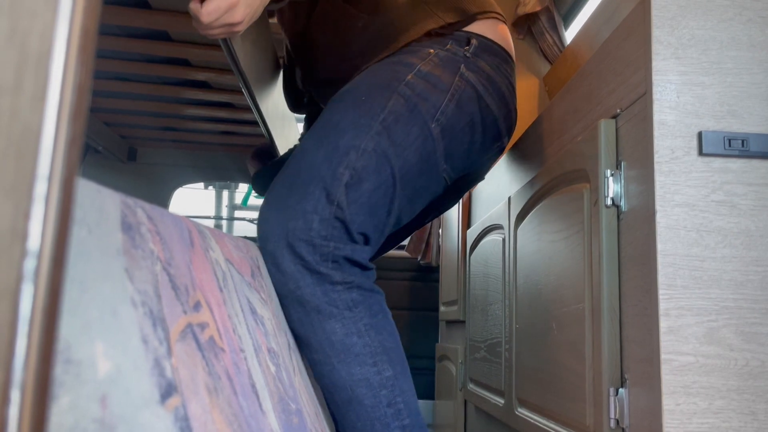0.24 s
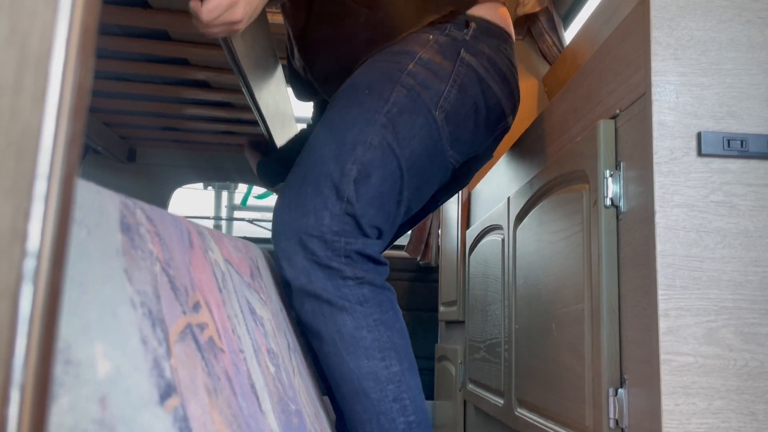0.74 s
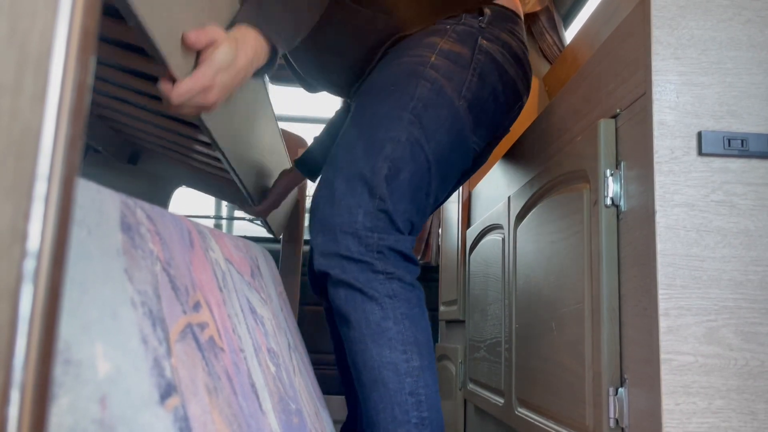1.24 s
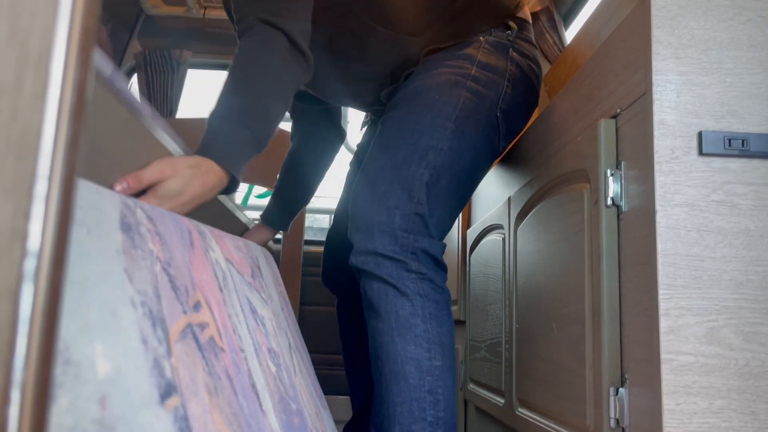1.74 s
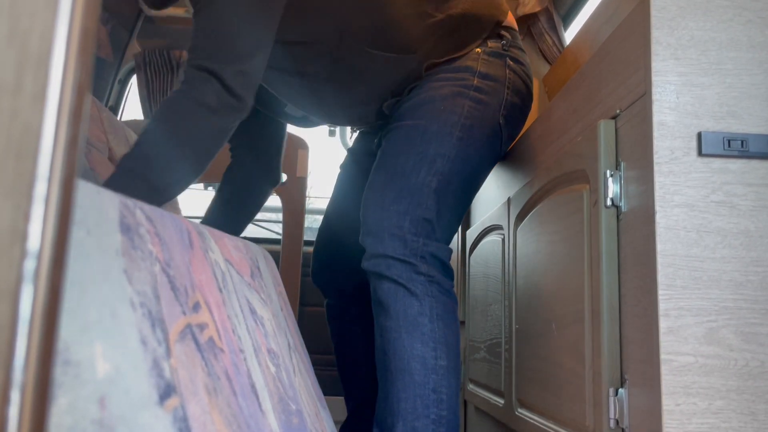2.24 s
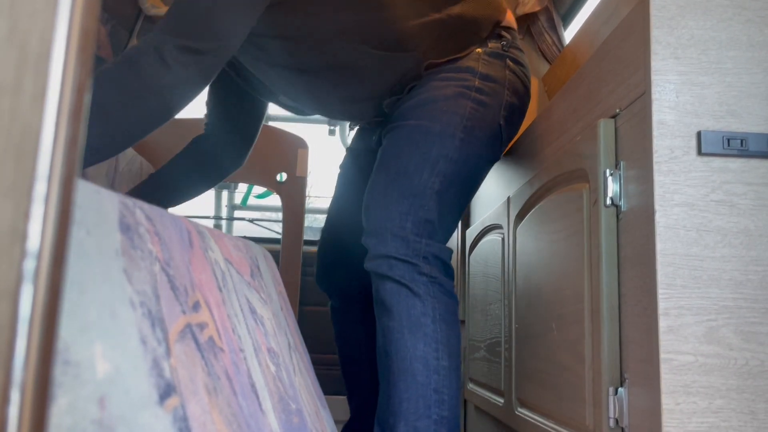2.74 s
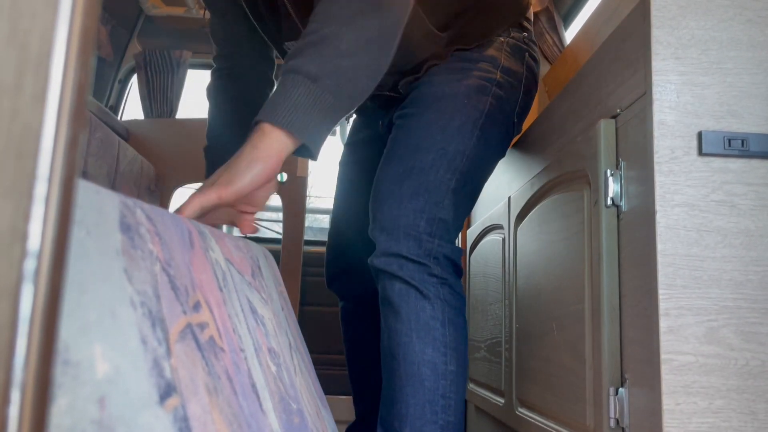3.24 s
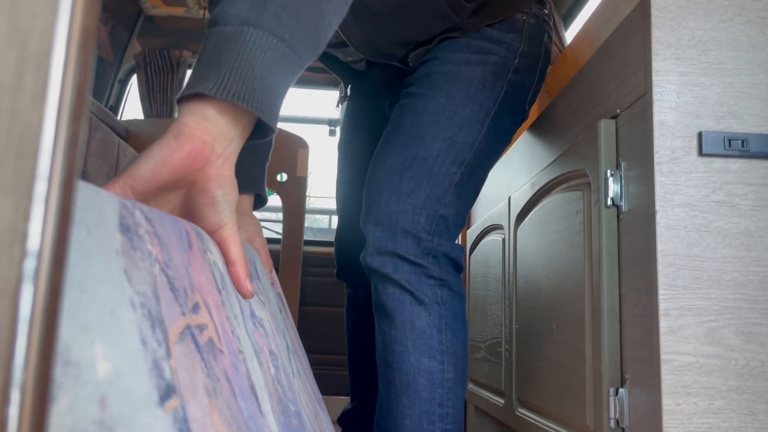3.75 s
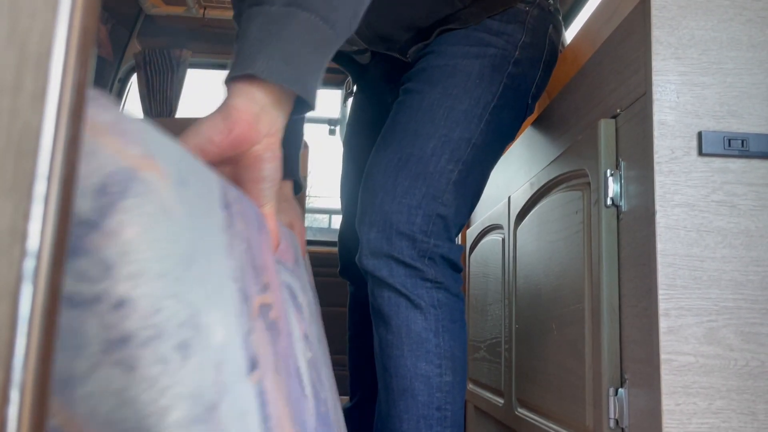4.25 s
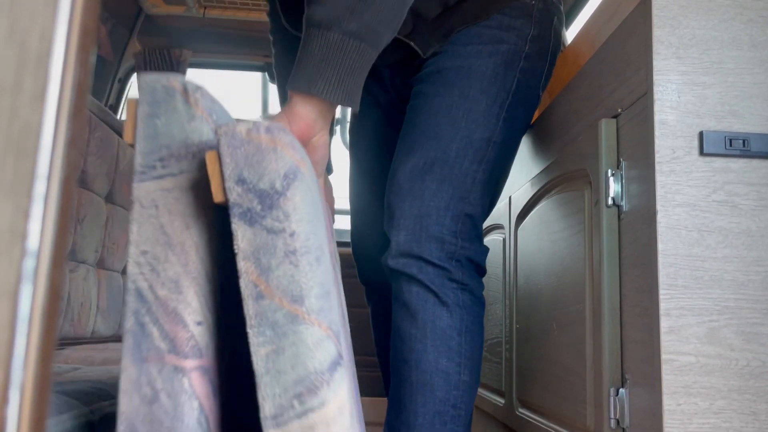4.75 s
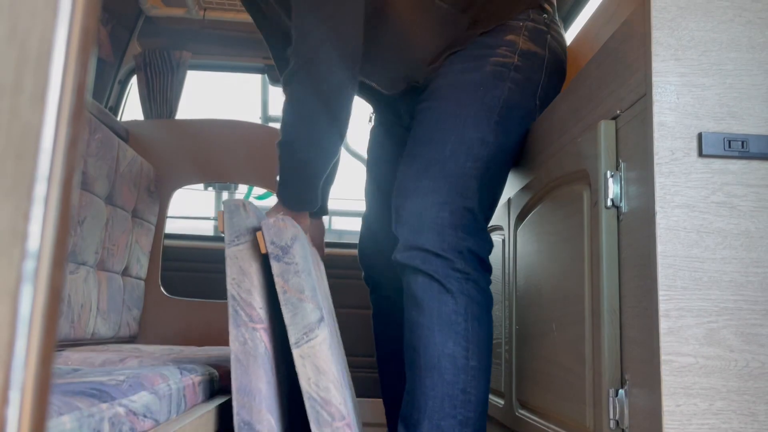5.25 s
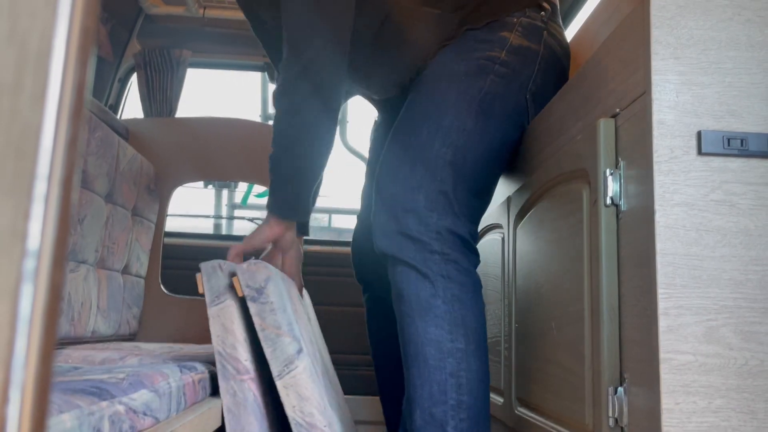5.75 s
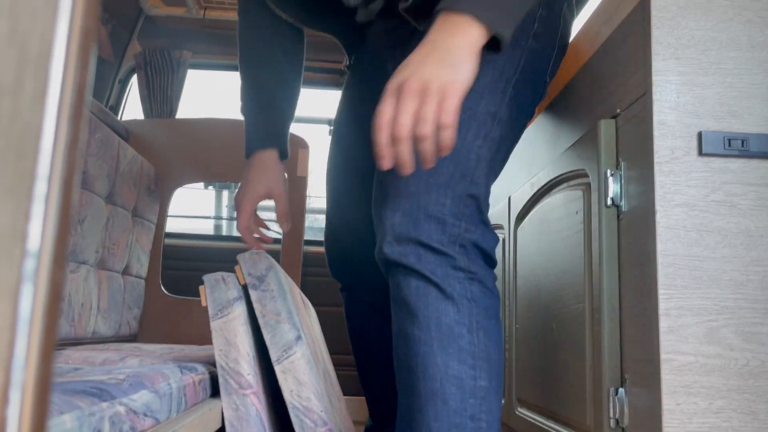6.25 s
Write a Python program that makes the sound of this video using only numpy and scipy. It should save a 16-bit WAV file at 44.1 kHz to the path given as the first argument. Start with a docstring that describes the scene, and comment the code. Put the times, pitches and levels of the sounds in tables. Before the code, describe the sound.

A low engine idle hums throughout, a deep droning boom with a slight throb that swells gently around 2.5 to 4 seconds. Close by, in a dry padded cabin, light wooden ticks and fabric scuffs at 0.3 to 0.7 s lead to a sharp, loud, rattling clack at 0.8 s. A small click follows at 1.25 s, with faint sleeve brushing. Around 2.4 to 2.6 s wood groans briefly and a soft thump lands. Clothing rustles lightly from 3.2 to 3.8 s. At 4.1 s a double dull knock starts the heavier part: a firm wooden thud at 4.8 s with a cloth snag at 4.9, sliding upholstery and a faint groan near 5.2, a deep thump at 5.4, two knocks at 5.75 and 5.87, a bassy thud at 6.0, and a final loud wooden slam at 6.45 s. Every impact dies quickly, leaving the hum.

```python
"""In a camper van with its engine idling, a bench seat is folded by hand.
The engine is a stack of hums over throbbing noise; clothes and upholstery are shaped hiss.
Dragged wood groans as noise around one pitch, and cushions land as short, low floor swings.
The slatted wooden frame clacks: each blow is a sum of short rings plus a rattling noise burst.
The small padded cabin swallows every ring quickly."""
import sys
import numpy as np
from scipy import signal
from scipy.fft import rfft, irfft
from scipy.io import wavfile

SR = 44100
rng = np.random.default_rng(int(sys.argv[2]) if len(sys.argv) > 2 else 0)


def unload_wav(signal):
    """Save mono or channel-first audio to the path in sys.argv[1] as 16-bit WAV at rate SR, clipped to [-1, 1]."""
    wavfile.write(
        sys.argv[1],
        SR,
        np.round(np.clip(np.atleast_2d(signal).T, -1, 1) * 32767).astype(np.int16),
    )


N = 287091


def amp(db):
    """Turns decibels into a gain."""
    return 10 ** (np.asarray(db) / 20)


def unit(x):
    """Scales a sound to an rms of 1."""
    return x / np.sqrt(np.mean(x ** 2) + 1e-20)


def read(points, hz, axis=1):
    """Reads a table column between its rows, along a log-frequency axis."""
    table = np.array(points)
    return np.interp(np.log(hz + 1), np.log(table[:, 0] + 1), table[:, axis])


def curve(rows, axis=1):
    """Reads a column of a table of times at every sample."""
    table = np.array(rows)
    return np.interp(np.arange(N) / SR, table[:, 0], table[:, axis])


def add(mix, s, sound):
    """Mixes a stereo sound in at time s."""
    start = max(round(s * SR), 0)
    part = mix[:, start:][:, :sound.shape[1]]
    part += sound[:, :part.shape[1]]


def wander(rate, size=N):
    """Slow random motion of rms 1; rate (Hz) sets how fast it may move."""
    hz = np.fft.rfftfreq(size, 1 / SR)
    slow = rfft(rng.standard_normal(size)) * np.exp(-(hz / rate) ** 2)
    return unit(irfft(slow, size))


# How alike the two microphone ports hear a sound from all around:
# f/Hz, left-right likeness (0 to 1), phase by which left leads/rad
PORTS = [(52, 0.81, 2.5), (124, 0.83, -0.73), (244, 0.55, 0), (506, 0.94, -1.5), (835, 0.15, -1.5),
         (1440, 0.2, -3), (2170, 0.65, -0.7), (5830, 0.33, 1.07), (7500, 0.34, -12.5), (11300, 1, -5)]


def noise(spectrum, size=N, direct=0):
    """Coloured stereo noise of rms 1; sound that comes directly reaches both ports alike."""
    hz = np.fft.rfftfreq(size, 1 / SR)
    left, other = rfft(rng.standard_normal((2, size)))
    same = np.clip(direct + (1 - direct) * read(PORTS, hz), 0, 1)
    lag = (1 - direct) * read(PORTS, hz, axis=2)
    right = (same * left + np.sqrt(1 - same ** 2) * other) * np.exp(-1j * lag)
    return unit(irfft(np.array([left, right]) * amp(read(spectrum, hz)), size))


# Idling speed and the cabin boom on the third order: t/s, firing rate f/Hz, level/dB
IDLE = [(0, 23.18, -26.5), (.5, 23.44, -29.5), (1.0, 23.45, -30), (1.8, 23.5, -29.5), (2.4, 23.41, -25.5),
        (3.2, 23.21, -24), (4.2, 23.34, -25.5), (4.9, 23.31, -27), (6.51, 23.61, -27.5)]
# Steady engine orders: multiple of the firing rate, level/dB
ORDERS = [(1, -42), (2, -34.5), (4, -38.5), (6, -39), (7, -40), (8, -49), (9, -46.5), (10, -53.5),
          (11, -67.5), (13, -56), (14, -56)]
# Colour of the engine noise through the body: f/Hz, relative level per Hz/dB
DRONE = [(120, -7), (200, 5), (270, -4.5), (400, -1.5), (600, -7), (900, -7), (1300, -14), (1800, -21.5),
         (2500, -27), (3500, -37), (5000, -37), (6500, -41), (11000, -57.5), (14500, -57.5)]
# Colour of the body's low shudder: f/Hz, relative level per Hz/dB
SHUDDER = [(25, -20), (45, -1.5), (62, 6.5), (85, 2.5), (125, 8), (180, -9.5), (260, -10.5), (450, -54.5)]


def engine(unsteady=0.074, dispersion=1.72, port_lag_s=0.00047, clatter=0.046,
           drone_db=-38, shudder_db=-33, fifth_db=-32.5, fifth_trade=0.7):
    """Multiples of the firing rate boom in the cabin; mechanical noise throbs with each firing."""
    turn = 2 * np.pi * np.cumsum(curve(IDLE)) / SR
    # the left port lags
    ports = turn - 2 * np.pi * IDLE[0][1] * np.array([[port_lag_s], [0]])
    boom_db = curve(IDLE, axis=2)
    # the fifth order sinks as the boom swells
    moving_fifth_db = fifth_db - fifth_trade * (boom_db - boom_db.mean())
    hum = np.zeros((2, N))
    for order, db in [(3, boom_db), (5, moving_fifth_db), *ORDERS]:
        level = np.sqrt(2) * amp(db) * (1 + unsteady * wander(11))
        # the body delays high orders more, which smears each firing into a hum
        hum += level * np.cos(order * ports - dispersion * order ** 2)
    throb = (1 + clatter * np.cos(turn)) * amp(1.6 * wander(18))
    drone = amp(drone_db) * noise(DRONE) * throb
    return hum + drone + amp(shudder_db) * noise(SHUDDER)


def strokes(rows):
    """Each movement gathers speed and slows again, so its friction swells in a bell."""
    t = np.arange(N) / SR
    power = sum(amp(db) ** 2 * np.exp(-2 * (2 * (t - s) / length) ** 2) for s, db, length in rows)
    return np.sqrt(power)


def fibre_grain():
    """Fibres catch and slip, so the level of every cloth sound flickers finely."""
    return amp(1.2 * wander(250))


# Sleeves brushing as the arms move: t/s (middle of the stroke), relative level/dB, length/s
SLEEVES = [(.12, -75, 0.21), (1.38, -65.5, 0.38), (1.8, -65.5, 0.29), (2.37, -70, .12), (2.55, -68, .11),
           (3.24, -66.5, .15), (3.37, -62.5, 0.085), (3.5, -61.5, 0.074), (3.62, -64.5, 0.11),
           (3.79, -67, 0.074), (4.55, -68.5, 1.0), (5.17, -58, 0.42), (5.77, -64.5, 0.25), (6.03, -66, 0.4),
           (6.34, -58, 0.13)]
# Colour of clothes brushing: f/Hz, relative level per Hz/dB
CLOTH = [(1000, -8.5), (2500, 0), (5000, 1), (7000, -4), (11000, -2.5), (13000, -9), (15000, -24.5)]


def sleeves(gain_db=4.0):
    """Fine clothing fibres catch and slip against each other as a soft hiss."""
    return amp(gain_db) * noise(CLOTH) * strokes(SLEEVES)


# Upholstery sliding over wood at each push: t/s (middle of the push), relative level/dB, length/s
PUSHES = [(.12, -51, 0.21), (.45, -38, 0.064), (.77, -40.5, 0.17), (2.54, -47, 0.11), (3.33, -49.5, 0.17),
          (4.15, -56, .2), (5.18, -46.5, 0.75), (5.78, -49, 0.27), (6.34, -47.5, 0.23)]
# Colour of upholstery on wood: f/Hz, relative level per Hz/dB
RUB = [(150, -14), (400, 14), (1000, 15), (2300, 0), (4500, -7.5), (7000, -21), (14000, -40)]


def upholstery(gain_db=1.5, catch_db=2.5, catches_hz=110):
    """Coarse seat fabric catches and slips on wood, which makes a jerkier, darker rub."""
    jerks = amp(gain_db + catch_db * wander(catches_hz))
    return noise(RUB) * jerks * strokes(PUSHES)


# Quick scuffs where cloth snags and lets go: t/s, relative level/dB, fall time/s
SCUFFS = [(.11, -55, 0.0083), (.466, -49, .0055), (.682, -43, 0.015), (.808, -34, 0.009),
          (3.722, -62, 0.0052), (4.895, -44, 0.016), (4.91, -29.5, 0.0082), (5.262, -46, 0.0088),
          (5.418, -48, 0.019), (6.262, -48, .011), (6.452, -39.5, .005)]
# Colour of a scuff: f/Hz, relative level per Hz/dB
SCUFF_COLOUR = [(150, -23), (500, 13.5), (1300, 7.5), (2000, -3), (3500, -2.5), (6500, -1), (10500, -5.5),
                (13000, -9), (15500, -14)]


def scuffs(rise_s=0.0039):
    """Snagged cloth lets go: noise rises quickly to a sharp peak and falls away."""
    t = np.arange(N) / SR
    snags = np.zeros(N)
    for s, db, fall in SCUFFS:
        snags += amp(db) * np.exp(-np.maximum((s - t) / rise_s, (t - s) / fall))
    return noise(SCUFF_COLOUR) * snags


def drag(db, length, hz, skirt_db=-24):
    """Wood dragged on wood groans as noise in one narrow resonance."""
    size = round(length * SR)
    resonance = [(hz / 4, 2 * skirt_db), (hz / 1.1, skirt_db), (hz, 0), (hz * 1.08, skirt_db),
                 (hz * 4, 2 * skirt_db), (SR / 2, 4 * skirt_db)]
    swell = np.sin(np.pi * np.arange(size) / size)
    return amp(db) * noise(resonance, size=size) * swell


# The frame dragging on its runners: t/s, level/dB, length/s, resonance f/Hz
DRAGS = [(2.406, -39, 0.09, 740), (2.5, -40, 0.2, 462), (5.24, -39, 0.1, 266)]


def drags(mix):
    """Adds each groan of the frame as it is dragged along its runners."""
    for s, db, length, hz in DRAGS:
        add(mix, s, drag(db, length, hz))


# Colour of the cushions settling: f/Hz, relative level per Hz/dB
SETTLE = [(40, -14), (90, -8.5), (180, 11.5), (330, -1.5), (600, -10), (1200, -20), (2500, -39),
          (6000, -51)]


def thump(db, hz, swell, linger=0.013, linger_s=0.045, settle_db=-13, settle_s=0.045):
    """The floor panel swells under the weight and swings a few times while the cushions settle."""
    t = np.arange(SR // 3) / SR
    onset = 1 - np.exp(-t / swell)
    push = (t / swell / 2) ** 2 * np.exp(2 - t / swell)
    shape = push + linger * onset * np.exp(-t / linger_s)
    panel = shape * np.sin(2 * np.pi * hz * t + np.array([[.2], [0]]))
    settling = noise(SETTLE, size=len(t), direct=0.59) * onset * np.exp(-t / settle_s)
    return amp(db) * (panel + amp(settle_db) * settling)


# Weight landing on the floor: t/s, level/dB, f/Hz, swell time/s (the peak comes at twice this)
THUMPS = [(2.531, -12, 133, 0.0061), (4.08, -10.5, 107, 0.0066), (4.106, -10, 153.3, 0.013),
          (4.784, -7.5, 131, 0.0056), (5.415, -6, 83, 0.0096), (5.755, -13, 135, 0.0065),
          (5.872, -12, 81, 0.0082), (6.0, -5, 91.6, 0.0094), (6.456, -2.5, 160.7, 0.0067),
          (6.46, -14.5, 71, 0.019)]


def thumps(mix):
    """Adds each dull knock of weight landing on the floor panel."""
    for s, db, hz, swell in THUMPS:
        add(mix, s, thump(db, hz, swell))


def blow_colour(hz, panel_hz, dullness, bass_loss=7.5, frame_follows_db=-10,
                panel_db=3.5, panel_octaves=0.27):
    """A blow is strongest near its panel's pitch; a padded contact loses treble faster (result in dB)."""
    octaves = np.log2(hz / panel_hz)
    # a panel radiates less bass (dB per octave), down to where the whole frame follows the blow
    below = np.maximum(bass_loss * octaves, frame_follows_db)
    slope = np.where(octaves < 0, below, -dullness * octaves)
    return slope + panel_db * np.exp(-(octaves / panel_octaves) ** 2)


def disperse(x, lag_cycles):
    """Bending waves run slower at low pitch, so low frequencies arrive later than high ones."""
    hz = np.fft.rfftfreq(x.shape[1], 1 / SR)
    turned = rfft(x) * np.exp(-2j * np.pi * lag_cycles * np.log(hz + 100))
    return irfft(turned, x.shape[1])


# Ringing modes of the wooden frame: f/Hz (before a small random detuning), relative level/dB,
# time to fall by 60 dB/s (before the contact's damping)
FRAME = [(161.8, -2, 0.39), (217, 4.5, 0.16), (305.5, 2, .12), (364, 5.5, 0.091), (466.6, 3.5, 0.12),
         (575, 0, 0.11), (625, 0.5, 0.11), (722, -3.5, 0.083), (864, -1.5, 0.1), (1002, -0.5, 0.09),
         (1270, -5, 0.017), (1434, 0.5, 0.084), (1612, -6, .06), (1730, -4.5, .045), (1880, -11, 0.045),
         (2055, -2.5, 0.072), (2270, -4, 0.043), (2433, -2.5, .07), (2680, -7.5, 0.095),
         (3060, -7.5, 0.088)]


def frame_ring(t, panel_hz, fall, dullness, build_cycles=0.64, spread=0.3, detune=.01, free_fall_s=0.0094):
    """A struck frame rings in many short modes at once."""
    ring = np.zeros((2, len(t)))
    for k, (hz, db, t60) in enumerate(FRAME):
        # a firm, short contact also damps the ring
        damped_t60 = t60 * np.sqrt(fall / free_fall_s)
        # low modes take longer to build up, so each knock falls in pitch
        build = 1 - np.exp(-(t * hz / build_cycles) ** 2)
        decay = amp(db + blow_colour(hz, panel_hz, dullness) - 60 * t / damped_t60)
        angle = spread * hz / 1000 * rng.standard_normal((2, 1))
        pitch = hz * (1 + detune * rng.uniform(-1, 1))
        ring += (-1) ** k * build * decay * np.sin(2 * np.pi * pitch * t + angle)
    return ring


# Colour of the rattling burst among slats and walls: f/Hz, relative level per Hz/dB
SCATTER = [(100, -9.5), (300, -3.5), (650, -3.5), (1800, -8.5), (4600, -7), (7000, -9.5), (13000, -19)]


def rattling_burst(t, panel_hz, fall, dullness, rise_share=0.28, tail_db=-21, tail_fall_s=0.019,
                   rattle_db=3.0, peak_db=4.5, peak_width=.025):
    """Loose slats and close walls scatter a blow into a short burst of rattling noise."""
    bands = np.geomspace(50, 16000, 600)
    # the chatter stands out at the frame's modes; the width is a share of each pitch
    near_mode = np.max([np.exp(-((bands / hz - 1) / peak_width) ** 2) for hz, db, t60 in FRAME], axis=0)
    colour_db = read(SCATTER, bands) + blow_colour(bands, panel_hz, dullness) + peak_db * near_mode
    spectrum = np.column_stack([bands, colour_db])
    rise = 1 - np.exp(-(t / (rise_share * fall)) ** 2)
    burst = rise * (np.exp(-t / fall) + amp(tail_db) * np.exp(-t / tail_fall_s))
    # chattering contacts shift the energy of the blow in time without adding to it
    rattle = amp(rattle_db * wander(670, size=len(t)))
    chatter = unit(noise(spectrum, size=len(t), direct=0.55) * burst * rattle)
    return chatter * np.sqrt(np.mean(burst ** 2))


def knock(db, panel_hz, fall, dullness, ring_db=-6.0, scatter_db=2, lag_cycles=0.8014):
    """One blow makes the frame ring and its slats rattle; both travel as bending waves."""
    t = np.arange(8192) / SR
    ring = amp(ring_db) * frame_ring(t, panel_hz, fall, dullness)
    scatter = amp(scatter_db) * rattling_burst(t, panel_hz, fall, dullness)
    return amp(db) * disperse(ring + scatter, lag_cycles)


# Blows on the frame: t/s, relative level/dB, f/Hz of the struck panel, burst decay time/s,
# dullness (treble loss above that pitch)/dB per octave
KNOCKS = [(.339, -28.5, 1380, 0.013, 15.5), (.409, -36, 418, .008, 7), (.464, -29, 475, 0.0083, 8),
          (.716, -25.5, 1000, 0.0067, 11.5), (.764, -46, 1890, 0.025, 21), (.802, -9.5, 1560, 0.0072, 11),
          (.803, -8, 644, 0.0081, 14), (.972, -36, 594, .006, 11), (1.245, -21, 1900, .0035, 10),
          (1.993, -42, 1000, 0.0084, 12), (2.525, -30.5, 360, 0.013, 4.5), (4.071, -21, 505, 0.0082, 13.5),
          (4.101, -21.5, 310, 0.012, 10.5), (4.104, -30.5, 1070, 0.011, 19),
          (4.773, -19.5, 534, 0.0051, 12.5), (4.776, -11, 327, 0.0077, 12.5),
          (4.859, -24.5, 367, 0.005, 17), (5.263, -29, 215, 0.015, 6), (5.408, -39, 2000, 0.009, 7.5),
          (5.41, -13.5, 225, 0.0071, 13.5), (5.751, -19, 441.8, 0.0042, 11.5),
          (5.756, -17.5, 234, 0.012, 14), (5.815, -25.5, 304, 0.016, 11), (5.865, -25, 1250, 0.0045, 25),
          (5.868, -23, 400, 0.0096, 17), (5.991, -36.5, 2250, 0.0045, 18), (5.996, -15.5, 225, 0.012, 13.5),
          (6.105, -40.5, 1800, .006, 12), (6.45, -7.5, 763, 0.0069, 14), (6.456, -13, 430, .01, 16)]


def knocks(mix):
    """Adds each clack of the slatted frame as it is struck."""
    for s, db, panel_hz, fall, dullness in KNOCKS:
        add(mix, s, knock(db, panel_hz, fall, dullness))


def scene():
    """The folding seat and the cloth over the idling engine."""
    mix = engine() + (sleeves() + upholstery() + scuffs()) * fibre_grain()
    drags(mix)
    thumps(mix)
    knocks(mix)
    return mix


def record(dry, notch_db=-16, notch_hz=8300, notch_width_hz=600, left_db=0.37, edge_hz=13900):
    """The microphone ports cancel a narrow treble band; peaks round off; then the top is cut."""
    hz = np.fft.rfftfreq(N, 1 / SR)
    port = amp(notch_db * np.exp(-((hz - notch_hz) / notch_width_hz) ** 2))
    # left is slightly louder, right slightly softer
    heard = irfft(rfft(dry) * port, N) * amp([[left_db], [-left_db]])
    rounded = heard / (1 + heard ** 6) ** (1 / 6)
    lowpass = signal.firwin(255, edge_hz, window=("kaiser", 8), fs=SR)
    return signal.oaconvolve(rounded, lowpass[None], "same")


dry = scene()
out = record(dry)
unload_wav(out)
```